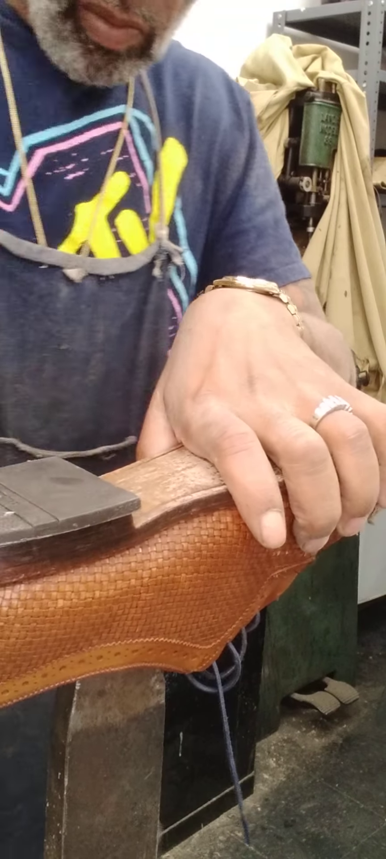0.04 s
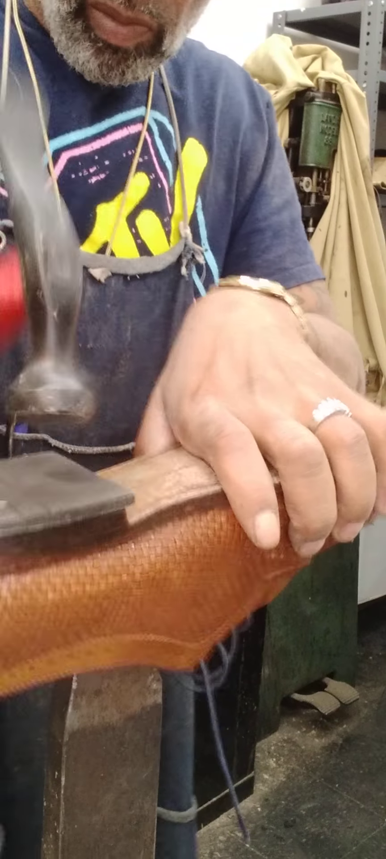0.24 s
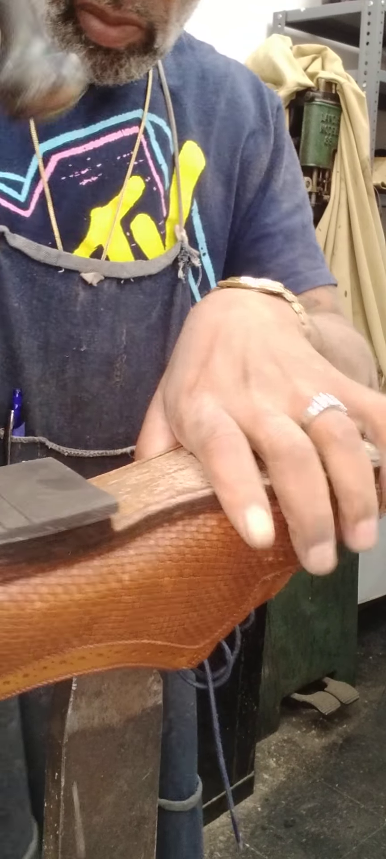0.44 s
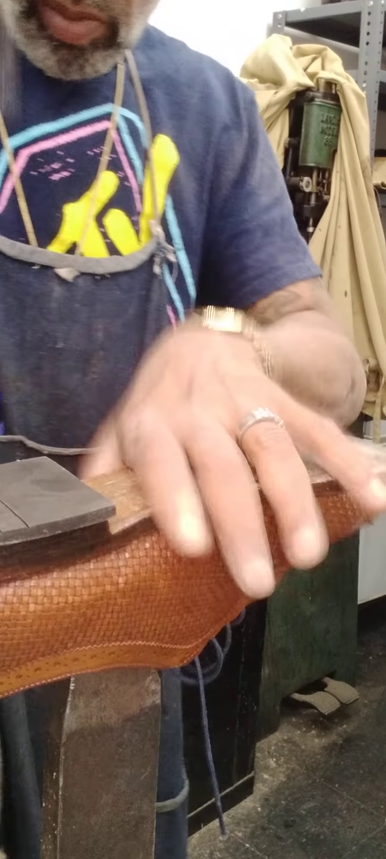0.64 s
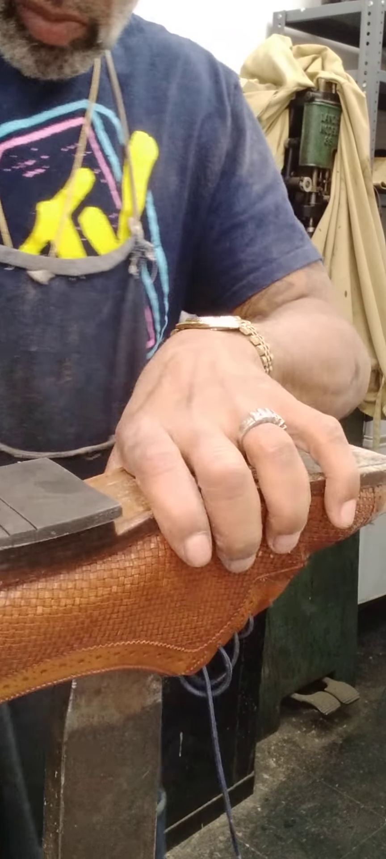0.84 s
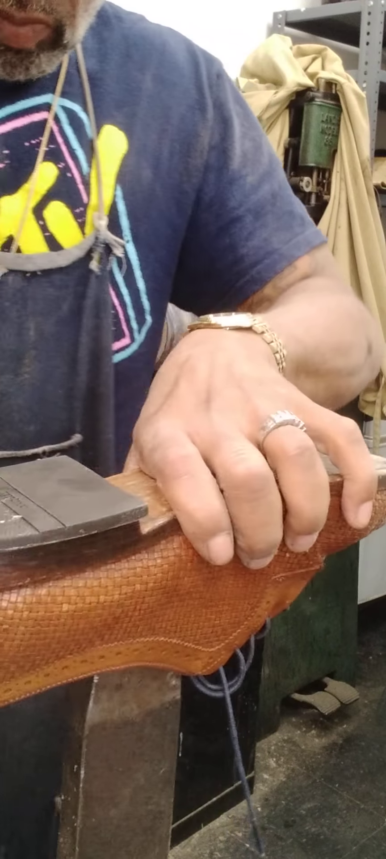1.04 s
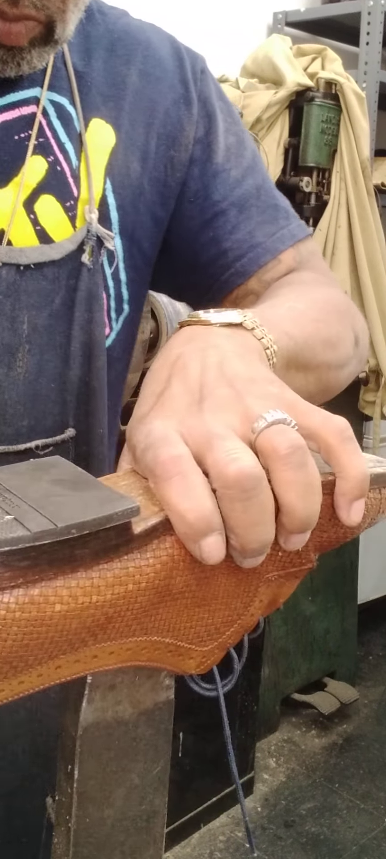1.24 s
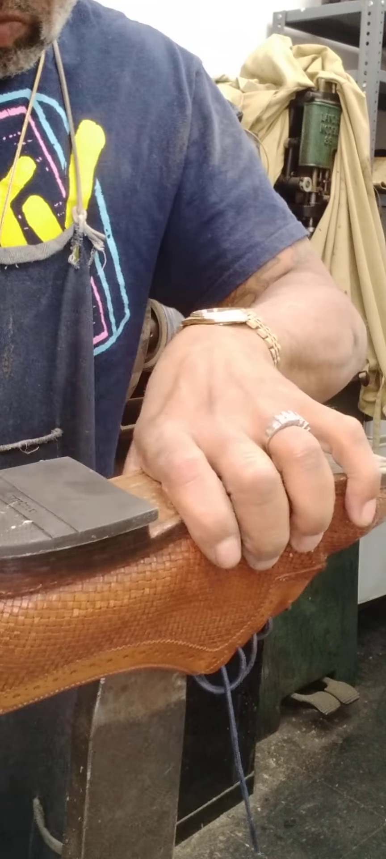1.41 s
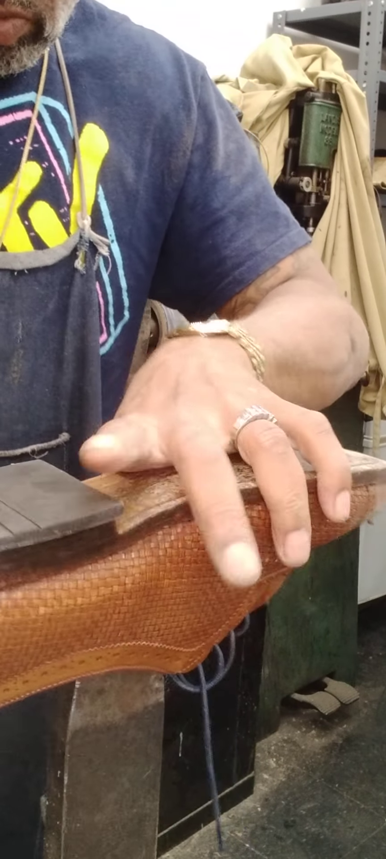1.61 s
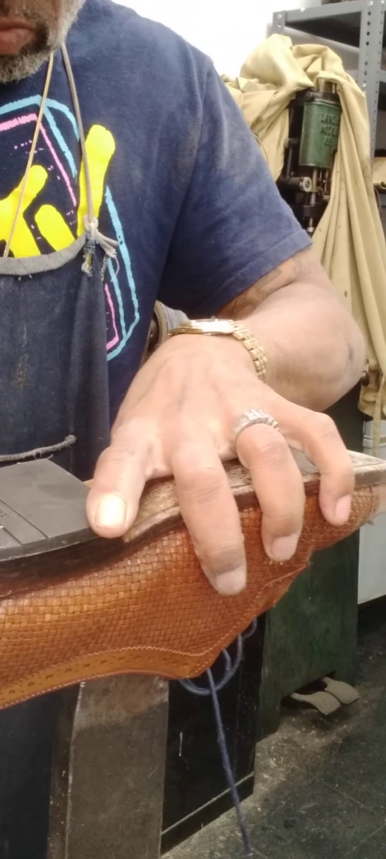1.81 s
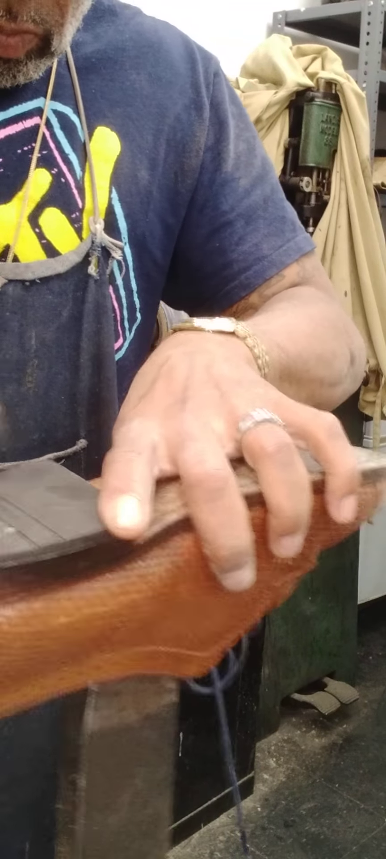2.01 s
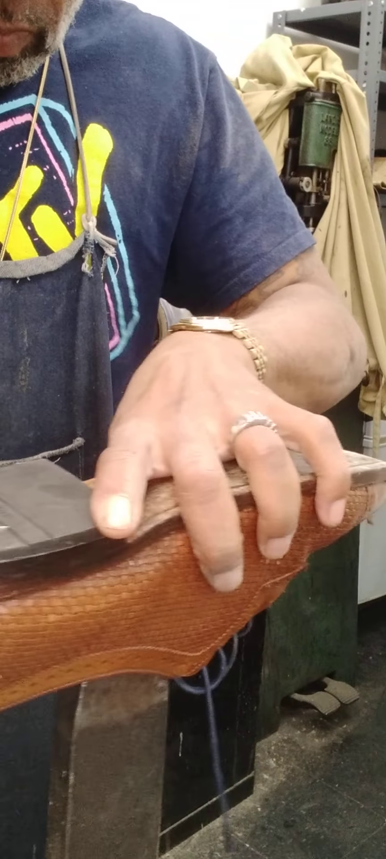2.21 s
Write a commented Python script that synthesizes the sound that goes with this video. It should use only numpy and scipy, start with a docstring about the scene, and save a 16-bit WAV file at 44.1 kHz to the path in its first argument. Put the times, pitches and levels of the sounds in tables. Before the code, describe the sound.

A hammer knocks sharply on a shoe heel four times in a small workshop.

```python
"""A cobbler's hammer strikes the heel of a leather shoe on an iron last, close up in a small workshop.
Three hard knocks and a softer, duller one follow the dying echo of an earlier blow. Each cracks on the
heel, sets shoe, last and hammer head ringing, and overloads the microphone.
Under them lie a low room rumble, hiss and mains hum; a hand rubs the sole and the shoe creaks faintly."""
import sys
import numpy as np
from scipy import signal
from scipy.fft import rfft, irfft, next_fast_len
from scipy.io import wavfile
from scipy.ndimage import map_coordinates

SR = 44100
rng = np.random.default_rng(int(sys.argv[2]) if len(sys.argv) > 2 else 0)


def bounce(signal):
    """Save signal as a 16-bit WAV file at the path given by the first command-line argument."""
    frames = np.transpose(np.atleast_2d(signal))
    limited = np.clip(frames, -1, 1)
    pcm = np.round(limited * 32767).astype(np.int16)
    wavfile.write(sys.argv[1], SR, pcm)


N = 103635
BLOW_SAMPLES = SR * 3 // 4
ATTACK_S = 0.0017


def amp(db):
    """Decibels to gain."""
    return 10 ** (np.asarray(db) / 20)


def unit(x):
    """Scale to rms 1."""
    return x / np.sqrt(np.mean(x ** 2) + 1e-20)


def along(points, hz):
    """Interpolate (hz, value) points on a log axis."""
    knots_hz, values = np.transpose(points)
    return np.interp(np.log(hz + 1), np.log(knots_hz + 1), values)


def filtered(x, response):
    """Apply the gain response(hz) by FFT."""
    n = x.shape[-1]
    size = next_fast_len(n + 8192)
    return irfft(rfft(x, size) * response(np.fft.rfftfreq(size, 1 / SR)), size)[..., :n]


def wobble(knots_per_s):
    """Smooth random curve."""
    return map_coordinates(rng.standard_normal(2048), [np.arange(N) * knots_per_s / SR], mode="mirror")


def add(out, start_s, x):
    """Mix x into out from start_s, which may be negative."""
    i = round(start_s * SR)
    x = x[:, max(-i, 0):max(N - i, 0)]
    out[:, max(i, 0):max(i, 0) + x.shape[1]] += x


# Left-right likeness of diffuse sound: freq_hz, correlation
DIFFUSE = [(60, .6), (130, 0.5), (300, 0.9), (640, .25), (1400, 0.1), (15000, 0.02)]


def noise(spectrum, size, likeness=DIFFUSE):
    """Stereo noise of rms 1 with a given spectrum and left-right correlation."""
    def mid_side_gains(hz):
        angle = np.arccos(np.clip(along(likeness, hz), -1, 1)) / 2
        return amp(along(spectrum, hz)) * [np.cos(angle), np.sin(angle)]
    mid, side = filtered(rng.standard_normal((2, size)), mid_side_gains)
    return unit(np.array([mid + side, mid - side]))


# Stereo balance of the shoe: freq_hz, left_minus_right_db
SHOE_BALANCE = [(300, -1), (1300, 0.5), (2400, 1.5), (4400, 8), (7500, 10), (13000, -10)]


def pan(hz, lean_db=0):
    """Left and right gains of the shoe, with an extra lean (left minus right, in dB; negative leans right)."""
    db = along(SHOE_BALANCE, hz) + lean_db
    return amp(np.array([db, -db]) / 2)


# Spectra of the heel's first flex and of its clatter: freq_hz, density_db
PUNCH_SPECTRUM = [(100, -17.5), (300, -3), (600, 3), (850, -3.5), (1150, 4.5), (1800, -6.5), (4000, -23.5),
                  (12000, -48.5)]
CLATTER_SPECTRUM = [(30, -18), (110, -14.5), (170, -5), (300, -5), (560, 1), (850, -8.5), (1200, 1.5),
                    (1550, -7), (2500, -8), (5000, -19.5), (7200, -18), (8500, -28.5), (10200, -28),
                    (11500, -46.5), (16000, -50)]
# Left-right likeness of the punch: freq_hz, correlation
DIRECT = [(150, 0.16), (500, .85), (1200, 0.32), (2500, .2), (6000, 0.038)]


def heel_knock(t, burst):
    """The heel flexes with a punch and a short dense clatter; the whole shoe gives way in one push."""
    punch_db, punch_t60_s = 9.5, 0.026
    clatter_db, hold_s, clatter_t60_s = -1, 0.0058, 0.077
    push_db, push_s = -17, 0.0036
    punch = burst(PUNCH_SPECTRUM, DIRECT) * amp(punch_db - 60 * t / punch_t60_s)
    clatter = burst(CLATTER_SPECTRUM) * amp(clatter_db - 60 * np.maximum(t - hold_s, 0) / clatter_t60_s)
    push = amp(push_db) * np.sin(2 * t / push_s) * np.exp(-t / push_s / 2)
    return (punch + clatter) * (1 - np.exp(-t / ATTACK_S)) + push


# Modes of shoe and last, and of the hammer head: pitch_hz, level_db, t60_s
SHOE_MODES = [(70.5, -25.5, 0.38), (123.25, -21, 0.33), (130.8, -12, 0.29), (213.8, -21, 0.13),
              (293.4, -8, 0.11), (377.8, -9, .1), (422.6, -15.5, .1), (504.3, -19.5, 0.064),
              (555.7, -13, 0.17), (675, -17, 0.14), (782, -19, 0.16), (1044, -8, 0.096), (1179, -15, 0.15)]
STEEL_MODES = [(3140, -25, .17), (3345, -30, 0.32), (6500, -37.5, 0.18), (6750, -34, 0.12),
               (6950, -32, 0.26), (6940, -37, 0.18), (7350, -32.5, .13)]


def ringing(t, colour_db, steel_db, scatter_db=2.5):
    """Shoe, last and hammer head ring in decaying modes, struck a little differently each time."""
    out = np.zeros((2, len(t)))
    for modes, offset_db in (SHOE_MODES, 0), (STEEL_MODES, steel_db):
        for hz, level_db, t60_s in modes:
            stereo_spread_rad = 0.39 * hz / 500
            phase = rng.uniform(0, 2 * np.pi) + stereo_spread_rad * rng.standard_normal((2, 1))
            db = level_db + offset_db + colour_db(hz) - scatter_db * rng.standard_normal()
            out += pan(hz)[:, None] * amp(db - 60 * t / t60_s) * np.sin(2 * np.pi * hz * t + phase)
    return out * (1 - np.exp(-t / ATTACK_S))


# Spectra of the near echo and of the far room's after-ring: freq_hz, density_db
ECHO_SPECTRUM = [(30, -29), (170, -12.5), (330, -2), (700, -5.5), (1150, -1.5), (1600, -8.5), (2400, -7.5),
                 (3400, -12.5), (6000, -19), (7300, -19), (8300, -25), (10200, -24.5), (11500, -34.5),
                 (16000, -48)]
LATE_SPECTRUM = [(200, -12.5), (500, 4.5), (1200, 5.5), (2300, -3), (2900, -10.5), (3300, -4.5),
                 (4200, -15), (6000, -20), (7200, -12.5), (8300, -28), (15000, -50)]
# Decay of the near echo: freq_hz, t60_s
ECHO_DECAY = [(100, 0.49), (400, 0.36), (1100, 0.31), (3000, 0.25), (7000, .26), (14000, .19)]


def room_echo(t, burst, echo_db, late_db, rise_s=0.0041, late_t60_s=1.45):
    """The workshop's echo dies fastest in the treble; the far room rings on faintly."""
    hz, frame_s, frames = signal.stft(burst(ECHO_SPECTRUM), SR, nperseg=256)
    decay = amp(-60 * frame_s / along(ECHO_DECAY, hz)[:, None])
    echo = signal.istft(frames * decay, SR, nperseg=256)[1][:, :len(t)]
    echo *= amp(echo_db - 9) * (1 - np.exp(-t / rise_s))
    late = burst(LATE_SPECTRUM) * amp(late_db - 41 - 60 * t / late_t60_s)
    return echo + late


# Reach of a blow's bass weight, mid bite, brightness and lean to the right: freq_hz, share
WEIGHT_BAND = [(150, 1), (260, 0.1)]
BITE_BAND = [(450, 0.27), (1000, 0.024), (1700, 0.9), (4500, 0.63), (7500, 0), (15000, .6)]
BRIGHT_BAND = [(4000, 0.22), (7000, 1), (10000, 0.88), (15000, .3)]
LEAN_BAND = [(2000, 0.027), (7000, 0.62), (14000, .3)]
# Spectrum of steel meeting the heel: freq_hz, density_db
CRACK_SPECTRUM = [(200, -28.5), (2000, -5), (5500, 0), (7000, 3.5), (8500, -5.5), (10200, -3),
                  (11300, -21.5), (16000, -29)]
# Blows: start_s, level_db, weight_db, bite_db, bright_db, hollow_hz, hollow_db,
# crack_db, steel_db, echo_db, late_db, lean_db
HAMMER_BLOWS = [(-.1, -1.5, -0.5, -1, -7, 404, -1, 13, 4.5, 6.5, 3.5, -1.5),
                (.2472, 3.5, -3, 0.5, -3.5, 301, 0, -0.5, -9.5, -1.5, 2.5, -2),
                (0.9276, -1, -3, 1.5, 1, 620, 1.5, -2, 6, -1, 3.5, -4),
                (1.3159, -0.5, -1, 1.5, -2, 560, 1.5, 3, -1.5, -2.5, 0, -8.5),
                (2.031, -6.5, 6, -9.5, 0, 388, 10, 7.5, -3, -3, 2, -1)]


def hammer(crack_t60_s=0.012, graze_lead_s=0.0018, graze_db=-30, hollow_octaves=0.4):
    """Steel grazes the heel, then hits it: crack, knock, ringing and echo, coloured blow by blow."""
    out, t = np.zeros((2, N)), np.arange(BLOW_SAMPLES) / SR
    for (start_s, level_db, weight_db, bite_db, bright_db, hollow_hz, hollow_db,
         crack_db, steel_db, echo_db, late_db, lean_db) in HAMMER_BLOWS:
        def colour_db(hz):
            sole_hollow = np.exp(-(np.log2((hz + 1) / hollow_hz) / hollow_octaves) ** 2)
            return (weight_db * along(WEIGHT_BAND, hz) + bite_db * along(BITE_BAND, hz)
                    + bright_db * along(BRIGHT_BAND, hz) + hollow_db * sole_hollow)

        def burst(spectrum, likeness=DIFFUSE):
            raw = noise(spectrum, BLOW_SAMPLES, likeness)
            return filtered(raw, lambda hz: amp(colour_db(hz)) * pan(hz, lean_db * along(LEAN_BAND, hz)))

        crack = burst(CRACK_SPECTRUM) * amp(-60 * t / crack_t60_s)
        strike = amp(crack_db - 9) * crack + heel_knock(t, burst) + ringing(t, colour_db, steel_db)
        echo = room_echo(t, burst, echo_db, late_db)
        add(out, start_s - graze_lead_s, amp(level_db + graze_db) * crack)
        add(out, start_s, amp(level_db) * (strike + echo))
    return out


# Spectrum of the room's steady noise: freq_hz, density_db
ROOM_SPECTRUM = [(15, -16.5), (28, 1.5), (70, -12), (125, -11.5), (175, -18.5), (310, -18.5), (500, -22.5),
                 (850, -26.5), (1200, -24.5), (2300, -30.5), (5000, -45), (7400, -53), (8500, -58.5),
                 (10300, -58), (12000, -73.5), (16000, -61.5)]
# Hiss envelope: time_s, gain_db
HISS_ENVELOPE = [(0, 5), (.6, -1.5), (.9, -2), (1.6, -0.5), (1.898, -5.5), (1.906, -23.5), (1.935, -19),
                 (1.97, -6), (2.35, -3)]
# Mains hum: pitch_hz, level_db
HUM_TONES = [(59.5, -54), (120, -55.5)]


def room_tone(level_db=-42.5, sway_db=4, crossover_hz=1200):
    """A swaying low rumble, a hiss that dips briefly, and mains hum."""
    t, air = np.arange(N) / SR, noise(ROOM_SPECTRUM, N)
    low = filtered(air, lambda hz: 1 / (1 + (hz / crossover_hz) ** 4))
    rumble = low * amp(sway_db * wobble(knots_per_s=12))
    hiss = (air - low) * amp(np.interp(t, *np.transpose(HISS_ENVELOPE)))
    hum = sum(amp(db) * np.sqrt(2) * np.sin(2 * np.pi * (hz * t + rng.random())) for hz, db in HUM_TONES)
    return amp(level_db) * (rumble + hiss) + hum


# Spectrum of skin on the sole: freq_hz, density_db
RUB_SPECTRUM = [(150, -2.5), (800, 11), (2200, 2), (4000, 1.5), (5800, -11.5), (7300, -11), (8600, -22),
                (10500, -23), (15000, -41)]
# Hand movements: peak_s, rise_s, fall_s, level_db, treble_db
HAND_RUBS = [(0.491, 0.12, .05, -49.5, 4.5), (.562, 0.05, 0.02, -48.5, 13), (.684, .004, 0.033, -57.5, 11),
             (2.17, .006, 0.017, -38.5, -1.5)]


def hand_rubs(grain_db=1.2):
    """Skin slides over the sole in short swells of grainy noise."""
    out, t = np.zeros((2, N)), np.arange(N) / SR
    for peak_s, rise_s, fall_s, level_db, treble_db in HAND_RUBS:
        friction = noise(RUB_SPECTRUM, N)
        rub = filtered(friction, lambda hz: amp(treble_db * along(BRIGHT_BAND, hz)) * pan(hz))
        envelope = np.exp(-np.abs(t - peak_s) / np.where(t < peak_s, rise_s, fall_s))
        out += amp(level_db + grain_db * wobble(knots_per_s=300)) * rub * envelope
    return out


# Creaks: peak_s, pitch_hz, level_db, half_length_s
SHOE_CREAKS = [(1.623, 706, -47, 0.042), (2.322, 675, -42, 0.021)]


def shoe_creaks(half_width_hz=54):
    """The shoe creaks faintly: brief swells of narrow-band noise."""
    out, t = np.zeros((2, N)), np.arange(N) / SR
    for peak_s, pitch_hz, level_db, half_length_s in SHOE_CREAKS:
        white = rng.standard_normal((2, N))
        creak = unit(filtered(white, lambda hz: 1 / (1 + ((hz - pitch_hz) / half_width_hz) ** 2)))
        out += amp(level_db) * creak * np.exp(-((t - peak_s) / half_length_s) ** 2)
    return out


def scene():
    """Hammer, hand and shoe over the room tone."""
    return hammer() + hand_rubs() + shoe_creaks() + room_tone()


def record(dry, ceiling=0.98, hardness=9, cutoff_hz=16000):
    """The blows overload the microphone; a steep low-pass follows the clipping."""
    clipped = ceiling * dry / (1 + np.abs(dry) ** hardness) ** (1 / hardness)
    return filtered(clipped, lambda hz: 1 / (1 + (hz / cutoff_hz) ** 80))


dry = scene()
out = record(dry)
bounce(out)
```